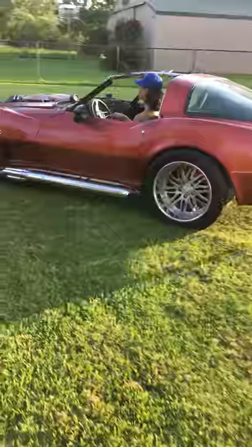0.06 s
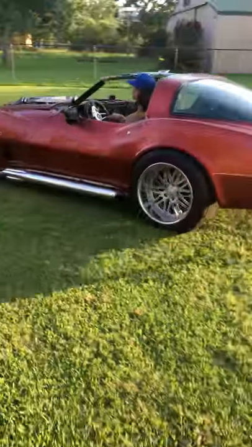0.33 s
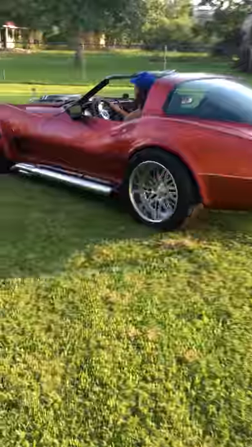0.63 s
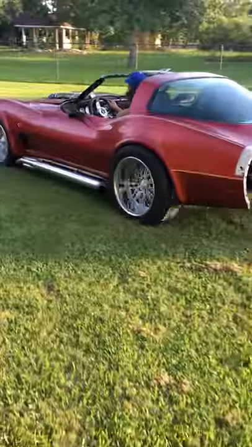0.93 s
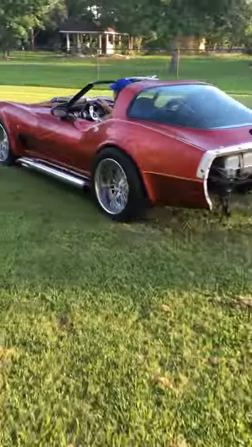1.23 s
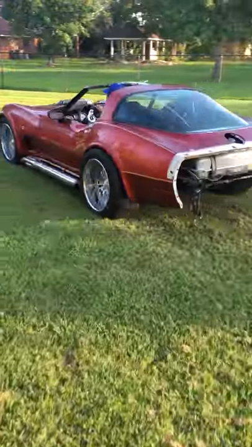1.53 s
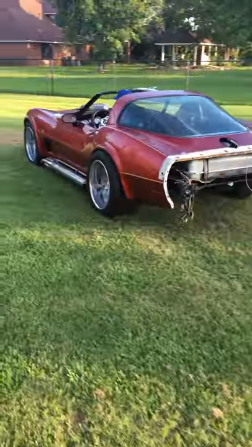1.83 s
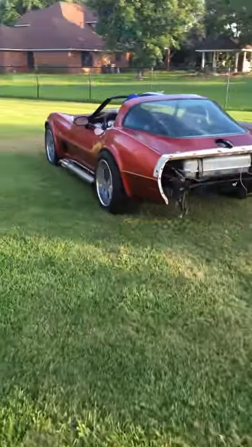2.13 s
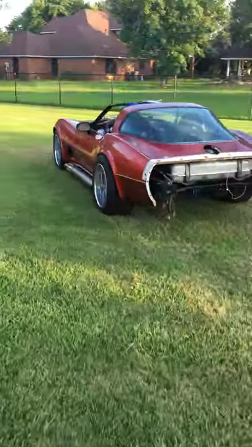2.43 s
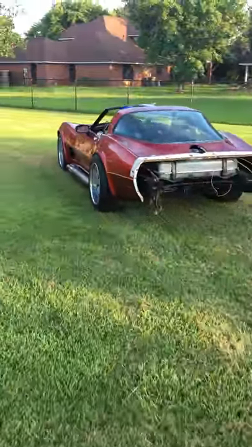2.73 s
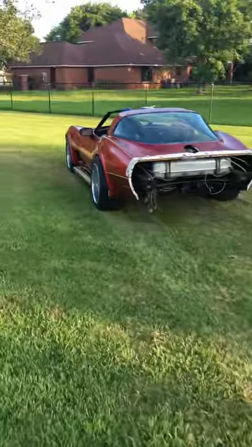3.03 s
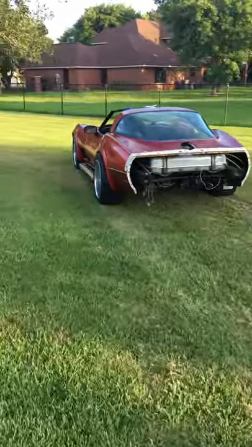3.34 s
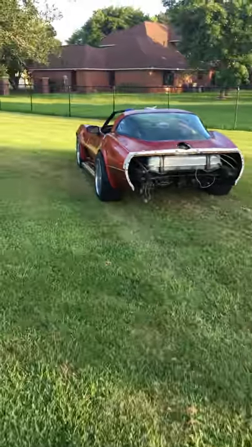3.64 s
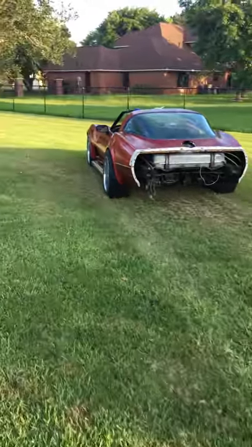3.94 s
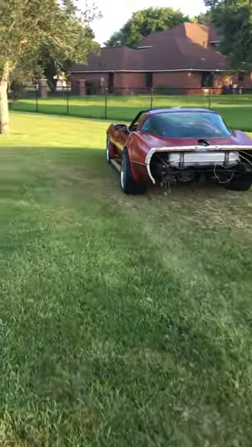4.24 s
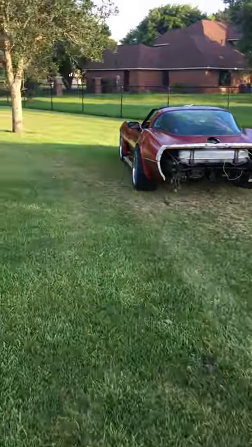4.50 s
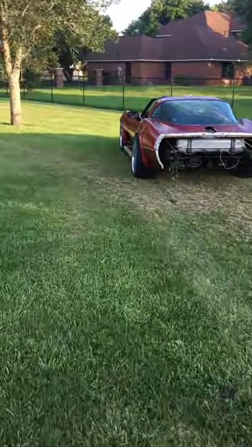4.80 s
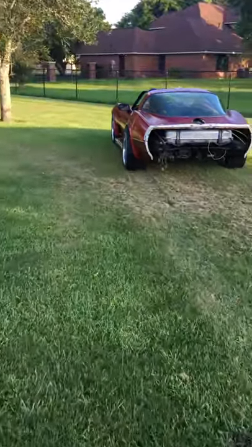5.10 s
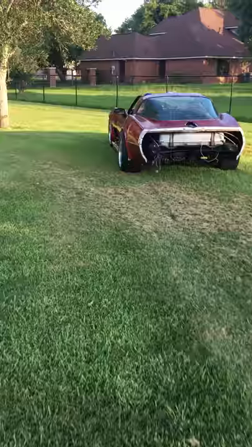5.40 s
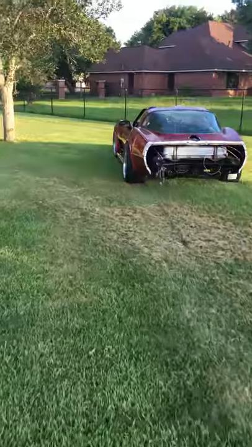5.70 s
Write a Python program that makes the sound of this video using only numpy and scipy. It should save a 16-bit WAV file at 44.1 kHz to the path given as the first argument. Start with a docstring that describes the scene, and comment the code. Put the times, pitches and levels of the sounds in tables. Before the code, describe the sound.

A deep, throbbing exhaust rumble starts close to the microphone in an open yard, from an old sports car moving at a crawl. As it draws away, the engine slows and sounds duller, its burble turning into a lumpy, rocking beat with a few small stumbles. Far beneath it are a light spitting hiss early on, slight metal rattles, and later soft steps and snapping stalks in the grass.

```python
"""A deep V8 burble moves away and slows into a lope, an uneven, rocking beat. It is an old sports car rolling
over a lawn, barely above idle. Each bank (row of cylinders) thumps through its own side pipe, a small exhaust
leak spits in time, and the fan whirs under the bonnet. Loose metal rattles and pings now and then; grass
rustles and knocks lightly underfoot near the microphone."""
import sys
import numpy as np
from scipy.fft import rfft, irfft, next_fast_len
from scipy.io import wavfile
from scipy.ndimage import uniform_filter1d, map_coordinates

SR = 44100
rng = np.random.default_rng(int(sys.argv[2]) if len(sys.argv) > 2 else 0)


def file_out(sig):
    """Save sig as 16-bit WAV at sys.argv[1]."""
    # one column per channel
    cols = np.atleast_2d(sig).T
    # limit, then scale
    lim = np.clip(cols, -1, 1)
    pcm = np.round(lim * 32767).astype(np.int16)
    wavfile.write(sys.argv[1], SR, pcm)


N = 258426
TIME = np.arange(N) / SR


def amp(db):
    """Turn decibels into a volume factor."""
    return 10 ** (np.asarray(db) / 20)


def unit(x):
    """Scale a sound to an average power of 1."""
    return x / np.sqrt(np.mean(x ** 2) + 1e-20)


def steady(x, size=13000):
    """Even out the loudness over about size samples."""
    power = uniform_filter1d(uniform_filter1d(x ** 2, size=size), size=size // 2)
    return x / np.sqrt(np.abs(power) + 1e-20)


def curves(rows, t=TIME):
    """Join a table's points with lines: one curve for each column after the time."""
    seconds, *columns = np.transpose(rows)
    return [np.interp(t, seconds, column) for column in columns]


def wobble(rate):
    """A smooth random curve through rate points a second."""
    return map_coordinates(rng.standard_normal(int(N * rate / SR) + 4), [TIME * rate])


def swell(start, length):
    """A smooth hump from start for length seconds."""
    return np.sin(np.pi * np.clip((TIME - start) / length, 0, 1))


def impulses(times, sizes):
    """One spike at each time."""
    return np.bincount(np.clip(times * SR, 0, N).astype(int), sizes, N + 1)[:N]


def filtered(x, response):
    """Reshape a sound: multiply each frequency f by response(f)."""
    size = next_fast_len(N + SR // 2)
    return irfft(rfft(x, size) * response(np.fft.rfftfreq(size, 1 / SR)), size)[:N]


def smear(x, fade_s):
    """Give every spike a fading tail."""
    return filtered(x, lambda f: 1 / (1 + 2j * np.pi * f * fade_s))


def band(x, low_hz, high_hz, order=10):
    """Keep what lies between two frequencies."""
    edge = lambda ratio: np.sqrt(1 + ratio ** (2 * order))
    return filtered(x, lambda f: (f / low_hz) ** order / (edge(f / low_hz) * edge(f / high_hz)))


def noise(colour):
    """Noise whose colour (the level at each frequency) follows a table."""
    hz, db = np.transpose(colour)
    return unit(filtered(rng.standard_normal(N), lambda f: amp(np.interp(np.log(f + 1), np.log(hz), db))))


def resonate(x, tones):
    """Ring at a set of natural tones; like a small pipe mouth, let little deep bass out."""
    ring = lambda f: sum(gain * 1j * f / (hz * hz - f * f + 1j * f * width) for hz, width, gain in tones)
    mouth = lambda f: -f * f / (50 ** 2 - f * f + 50j * f)
    return filtered(x, lambda f: ring(f) * mouth(f))


def taps(events, colour, fade_s):
    """Bursts of noise that start at once and drop 60 dB in fade_s."""
    return noise(colour) * sum(amp(db - 60 * np.abs(TIME - s) / fade_s) * (TIME >= s) for s, db in events)


# faint squeaks: t/s, length/s, f/Hz, level/dB
CHASSIS_SQUEAKS = [(0.717, .14, 3100, -53), (2.135, 0.033, 4550, -55), (3.531, 0.026, 2519, -51)]
def squeaks():
    """The car's frame flexes and gives short, unsteady tones."""
    waver_hz = 18 * wobble(280)
    return sum(amp(db) * swell(s, length) * np.sin(2 * np.pi * np.cumsum(hz + waver_hz) / SR)
               for s, length, hz, db in CHASSIS_SQUEAKS)


# light knocks: t/s, level/dB
KNOCK_TIMES = [(2.645, -44.5), (2.862, -49)]
# their dull colour: f/Hz, level/dB
KNOCK_NOISE = [(400, -10), (800, 5), (1500, -6), (2600, -3), (6000, -28), (15000, -40)]
def knocks():
    """Footsteps knock lightly."""
    return taps(KNOCK_TIMES, KNOCK_NOISE, fade_s=0.064)


# steps in the grass: t/s, length/s, level/dB
FOOTFALLS = [(2.198, 0.066, -48.5), (3.317, 0.14, -55.5), (4.134, 0.062, -52), (4.596, 0.13, -50.5),
             (4.77, 0.055, -50), (5.214, 0.12, -49), (5.366, 0.09, -49.5), (5.448, 0.036, -51)]
# colour of the rustle: f/Hz, level/dB
GRASS_NOISE = [(800, 0), (1150, 0), (1330, 1), (1700, 1.5), (2280, 3.5), (2900, 3), (4200, 2.5), (6000, -4),
               (10000, -3.5), (15000, -16)]
# hollow tones of the crunch: f/Hz, width/Hz, strength
CRUNCH_TONES = [(1320, 200, 1.2), (2330, 240, .8)]
def steps(crackle_db=3.2):
    """Grass blades crush in small bursts under each step, with a hollow crunch."""
    rustle = unit(noise(GRASS_NOISE) * amp(crackle_db * wobble(350)))
    crunch = unit(resonate(rustle, CRUNCH_TONES))
    return unit(rustle + 0.76 * crunch) * sum(amp(db) * swell(s, length) for s, length, db in FOOTFALLS)


# sharp metal pings: t/s, level/dB
PING_TIMES = [(2.338, -47), (2.757, -49), (3.55, -48), (3.645, -51), (3.943, -46), (4.259, -46.5),
              (4.574, -50), (4.931, -51), (5.184, -47)]
# their bright colour: f/Hz, level/dB
PING_NOISE = [(1000, -17), (2400, 9), (4000, -7), (8500, -4), (13000, -1), (15500, -4)]
def pings():
    """Hot metal on the car pings with sharp ticks."""
    return taps(PING_TIMES, PING_NOISE, fade_s=0.065)


# how far away the car is: t/s, distance/m
CAR_DISTANCE = [(0, 2), (.35, 3.37), (1.5, 3.97), (3, 6.43), (4.2, 8), (5.86, 8.2)]
def receding(near_db, loss_db, near_m=2.5):
    """Volume of a car part: near_db at near_m, and loss_db less each time the distance doubles."""
    return amp(near_db - loss_db * np.log2(curves(CAR_DISTANCE)[0] / near_m))


def turned(turn_s=2.95):
    """Rises from 0 with the car side-on to 1 once it shows its tail."""
    return np.clip(TIME / turn_s, 0, 1)


# belt tones: f/Hz, relative level/dB
BELT_TONES = [(911, -14), (1547, -16), (2428, -19.5), (6660, -24)]
def belt(drift_hz=18):
    """The belt drive whines, wavering a little in loudness and pitch."""
    whine = 0
    for hz, db in BELT_TONES:
        volume = amp(db + 1.4 * wobble(4.26)) * np.sqrt(2)
        cycles = hz * TIME + drift_hz * np.cumsum(wobble(60)) / SR
        whine += volume * np.sin(2 * np.pi * cycles)
    return amp(-53.5) * whine


# colour of the fan's rush: f/Hz, level/dB
FAN_NOISE = [(380, -6), (650, 3), (762, -4), (918, 1), (1200, -3.5), (1580, -3), (2390, -3), (2700, -8.5),
             (4400, -8.5), (4950, -11.5), (6300, -9), (8400, -10), (10500, -14), (11600, -15), (15500, -18)]
# colour of the rush from the side vents: f/Hz, level/dB
VENT_NOISE = [(850, -29), (1200, -1), (2000, 0), (2800, -15), (6000, -28)]
def fan(flutter_db=0.63, grain_db=0.7):
    """The fan pushes a fluttering rush of air, fuller while the side vents face the listener."""
    rush = amp(grain_db * wobble(300) + flutter_db * wobble(14)) * noise(FAN_NOISE)
    vents = np.sqrt(1 - turned()) * noise(VENT_NOISE)
    return receding(near_db=-45, loss_db=5.08) * rush + amp(-53) * vents


# fits of rattling: t/s, length/s, level/dB
RATTLE_FITS = [(1.049, .2, -57), (2.121, .26, -58), (2.76, 0.41, -56), (4.202, 0.1248, -57.5),
               (4.852, .1, -58)]
# tones of the loose metal: f/Hz, width/Hz, strength
METAL_TONES = [(7150, 310, 0.36), (8420, 400, 1)]
def rattle(spits):
    """Loose metal rings now and then, in time with the spitting leak."""
    shake = smear(spits, fade_s=0.024) * rng.standard_normal(N)
    fits = sum(amp(db) * swell(s, length) for s, length, db in RATTLE_FITS)
    return unit(resonate(shake, METAL_TONES)) * fits


def leak_spits(times, cylinder):
    """Gas escapes the manifold (where exhaust leaves the engine), mostly as the near bank fires."""
    cylinder_db = np.array([-31, 13, -26, 3.5, 13.5, -18, 14, 2])
    return impulses(times, amp(cylinder_db[cylinder] + rng.uniform(-6.5, 5.3, len(times))))


# colour of the leak's hiss: f/Hz, level/dB
HISS_NOISE = [(2000, -42), (2500, -0.5), (2900, -11), (4200, -8), (4900, -13.5), (6000, -1.5), (6650, 1.5),
              (7300, -1), (8250, 1), (9600, 1.5), (10400, -10.5), (11500, -3.5), (15500, -22)]
def leak(spits):
    """Each spit of gas makes a short hiss and a crisp crack, heard best early on, close by."""
    hiss = smear(smear(spits, fade_s=0.0012), fade_s=0.015) * noise(HISS_NOISE)
    crack = smear(spits, fade_s=0.0013) * noise([(6000, -25), (9000, -11), (14000, -2)])
    crispness = 0.5 * (1 - 0.59 * curves(CAR_COURSE)[-1])
    return receding(near_db=-47, loss_db=9.05) * (unit(hiss) + crispness * unit(crack))


# how fast the engine turns: t/s, speed/rpm
ENGINE_SPEED = [(0.0, 940), (0.6, 947.6), (1.5, 909.7), (1.8, 890.4), (2.7, 850.4), (2.85, 806),
                (3.45, 819.6), (4.2, 749), (4.35, 813.8), (4.5, 745), (4.65, 799.6), (4.95, 756),
                (5.1, 778.2), (5.86, 783.4)]
def firings():
    """When an exhaust valve opens, and on which cylinder: eight make one cycle of two engine turns."""
    count = np.cumsum(curves(ENGINE_SPEED)[0]) / 60 * 4 / SR - 0.5
    number = np.arange(int(count[-1]))
    return np.interp(number, count, TIME), number % 8


def surge(times, peak, count=1):
    """Swing between -1 and 1 count times per engine cycle; peak (0-1) places the top in the cycle."""
    cycles = np.interp(TIME, times, np.arange(len(times))) / 8
    return np.cos(2 * np.pi * count * (cycles - peak))


# the two pipes as the car turns away and slows:
# t/s, near delay/ms, far delay/ms, near level/dB, far level/dB, lope (0-1)
CAR_COURSE = [(0.0, 3.14, 7.94, 1, 1.5, 0.42), (0.8, 2.78, 7.47, 2.7, 9.5, 0.28),
              (1.5, 3.92, 7.53, -2.6, 0.5, 0.44), (2.2, 4.76, 7.67, -1, 2.5, 0.73),
              (3.0, 5.3, 6.7, 4, 0.7, 0.92), (4.0, 4.35, 3.47, 3, -1, 1),
              (5.86, 5.15, 6.92, -4, -2.5, 0.99)]
# cylinders in firing order: smooth lag/ms, smooth level/dB, loping lag/ms, loping level/dB
CYLINDER_HABITS = [(0.99, 0.1, 0.78, -1), (-0.13, -0.4, 0.7, 0.7), (-0.034, 0.1, -0.98, 1.5),
                   (-1.67, 4, -0.014, -4.5), (0.71, 0.9, 0.7, -0.5), (0.095, -0.26, 0.37, -0.7),
                   (0.19, 3.4, 0.34, -2.5), (-0.15, -0.5, -1.83, -0.8)]
# each cylinder's side, in firing order: 1 near, 0 far
CYLINDER_SIDE = [0, 1, 0, 1, 1, 0, 1, 0]
def gas_pulses(times, cylinder):
    """Puffs of gas from the near and far banks; each bank fires unevenly, which makes the burble."""
    near_ms, far_ms, near_db, far_db, lope = curves(CAR_COURSE, times)
    smooth_ms, smooth_db, lope_ms, lope_db = np.array(CYLINDER_HABITS)[cylinder].T
    near = np.array(CYLINDER_SIDE)[cylinder] > 0
    size_db = np.where(near, near_db, far_db) + (1 - lope) * smooth_db + lope * lope_db
    delay_ms = np.where(near, near_ms, far_ms) + (1 - lope) * smooth_ms + lope * lope_ms
    # at low speed the fuel burns differently every time
    burn, jitter = rng.standard_normal((len(times), 2)).T
    sizes = amp(size_db + (1.12 + 2.2 * lope) * np.tanh(burn))
    arrivals = times + (delay_ms + 0.21 * lope * jitter) / 1000
    return impulses(arrivals, sizes * near), impulses(arrivals, sizes * ~near)


# high pipe tones: f/Hz, width/Hz, signed strength
RASP_TONES = [(364, 44, 0.99), (412, 21, 0.28), (504, 25, -0.39), (537, 30, -0.35), (605.6, 32.6, 0.7)]
def rasp(times, pulses, swirl):
    """Swirling gas rasps in the pipes, peaking later in the cycle and less clearly as the car turns."""
    ring = band(resonate(pulses + 2.9 * swirl, RASP_TONES), 328, 568)
    surge_db = 3.5 * (1 - 0.61 * turned()) * surge(times, peak=0.62 + 0.37 * turned() ** 3)
    return receding(near_db=-41, loss_db=5.67) * steady(ring * amp(surge_db))


# middle pipe tones: f/Hz, width/Hz, signed strength
BARK_TONES = [(220.4, 20.6, 0.89), (267.1, 13.7, -1.25), (288, 22.7, -0.42), (335, 10, 0.073)]
def bark(times, pulses, swirl, lope):
    """The puffs bark in the pipes, rougher as the engine lopes."""
    ring = band(resonate(pulses + (0.61 + 0.39 * lope) * swirl, BARK_TONES), 183, 325)
    return receding(near_db=-24, loss_db=6.9) * steady(ring * amp(2 * surge(times, peak=0.93)))


def thuds(times, cylinder, centre_hz=118, width_hz=72):
    """Two short, round pushes each cycle, from the first two cylinders of the near bank."""
    pushes = impulses(times + 0.01237, cylinder == 1) + 0.65 * impulses(times + 0.018, cylinder == 3)
    rounding = lambda f: -1j * f * np.exp(-((f - centre_hz) / width_hz) ** 2) / (f + centre_hz)
    return unit(filtered(pushes, rounding))


# swells of the boom, once per cycle (first row) and once per engine turn (second row):
# smooth swing/dB, loping swing/dB, smooth peak (0-1), loping peak (0-1)
CHUG_SWELLS = [(1.5, 2, 0.45, 0.81), (0.9, 1.34, 0.73, .72)]
def chug(times, lope):
    """The boom's rise and fall in dB, deeper as the engine lopes."""
    return sum((smooth_db + lope * (lope_db - smooth_db))
               * surge(times, peak + lope * (lope_peak - peak), count)
               for count, (smooth_db, lope_db, peak, lope_peak) in enumerate(CHUG_SWELLS, start=1))


# low tones of the near pipe: f/Hz, width/Hz, signed strength
NEAR_TONES = [(37.9, 10, -0.44), (89.5, 8.3, -0.49), (115.16, 4.1, 0.55), (153.6, 14, -0.55),
              (174.2, 7.8, -0.83), (192.5, 11.6, 0.79), (231.5, 20.5, 0.29), (265, 35, 0.22)]
# low tones of the far pipe: f/Hz, width/Hz, signed strength
FAR_TONES = [(43.4, 6.7, -0.52), (76.1, 11.6, 0.5), (107.46, 5.7, 0.4), (135, 35, -0.076),
             (175.65, 13.6, -0.94), (200.9, 15.3, 0.36), (200, 15, 0.17), (271, 12, 0.13)]
# colour of the rumble scattered by the car's underside and the yard: f/Hz, level/dB
RUMBLE_NOISE = [(20, -48), (40, -28), (55, -27), (65, -4), (82, 7), (115, 5), (132, 4.5), (170, 12.5),
                (200, 2.5), (235, -10), (300, -60), (620, -120)]
# base loudness of the boom, which carries far: t/s, level/dB
BOOM_LEVEL = [(0, -17), (1.2, -17.5), (2.1, -16), (3.2, -17), (4.2, -19), (5.86, -19.5)]
def boom(times, cylinder, near, far, lope):
    """Each bank makes its own pipe boom; rumble and thuds grow as the engine lopes."""
    pipes = resonate(near, NEAR_TONES) + resonate(far, FAR_TONES)
    ring = steady(band(pipes, 12, 355, order=6))  # the pipes' packing rounds off each puff
    late_surge = surge(times, peak=0.8)
    ring += (0.15 + 0.29 * lope) * noise(RUMBLE_NOISE) * amp(3 * late_surge)
    # close firings late in each cycle pump up the upper tones: a "blub", split by a short gap
    gap = ((1 + surge(times, peak=0.752)) / 2) ** 20
    blub = band(ring, 144, 264.1) * (amp(4 * lope * late_surge - 5 * gap) - 1)
    beat = ring + blub + 0.31 * lope ** 2 * thuds(times, cylinder)
    return amp(curves(BOOM_LEVEL)[0] + chug(times, lope)) * steady(beat, size=4400)


# moments when the engine burns harder or falters: t/s, level change/dB
ENGINE_STUMBLES = [(1.9, 0.5), (3.86, 0.5), (4.11, -5), (4.27, 0.5), (4.58, -3), (4.71, 3), (4.85, -2),
                   (5.27, 1), (5.4, 1.5)]
def exhaust(times, cylinder, stumble_s=0.11):
    """Puffs of gas, and the swirl behind them, make the side pipes boom, bark and rasp."""
    near, far = gas_pulses(times, cylinder)
    lope = curves(CAR_COURSE)[-1]
    pulses = unit(near + far)
    swirl = unit(smear(pulses, fade_s=0.023) * rng.standard_normal(N))
    burn = amp(sum(db * swell(s - stumble_s / 2, stumble_s) for s, db in ENGINE_STUMBLES))
    return burn * (boom(times, cylinder, near, far, lope)
                   + bark(times, pulses, swirl, lope) + rasp(times, pulses, swirl))


def scene():
    """The car and the steps in open air."""
    times, cylinder = firings()
    pipes = exhaust(times, cylinder)
    spits = leak_spits(times, cylinder)
    car = pipes + leak(spits) + rattle(spits) + fan() + belt() + squeaks() + knocks()
    return (car + steps() + pings())[None]


def record(dry, top_hz=15750):
    """The microphone keeps nothing above top_hz."""
    return filtered(dry[0], lambda f: f < top_hz)[None]


dry = scene()
out = record(dry)
file_out(out)
```